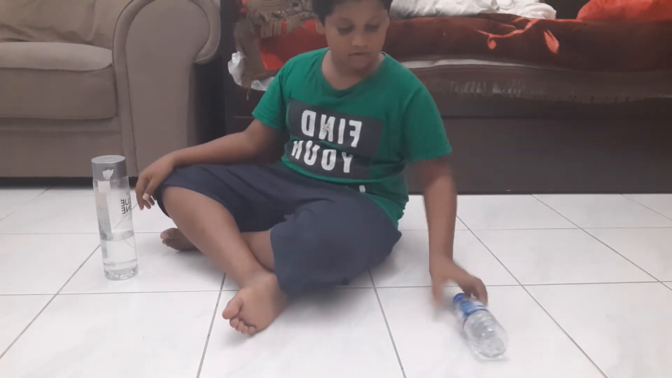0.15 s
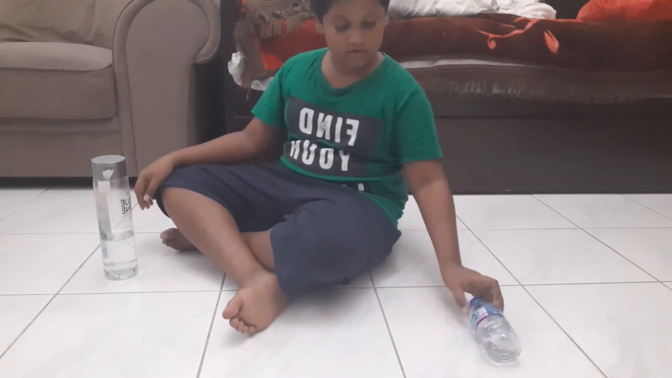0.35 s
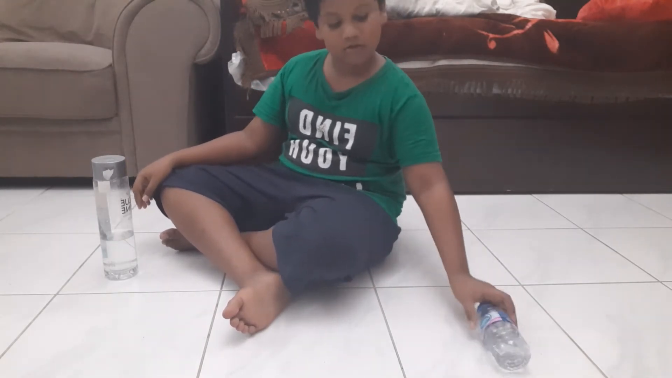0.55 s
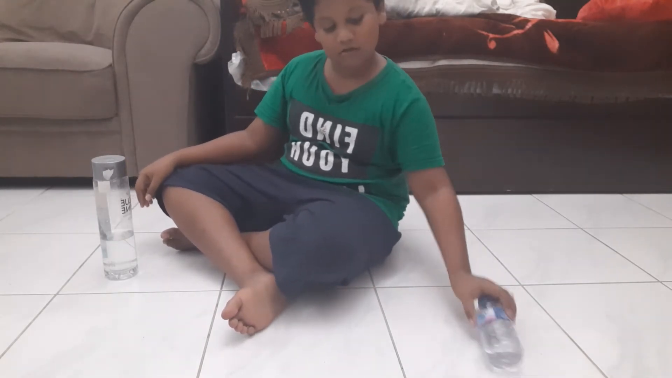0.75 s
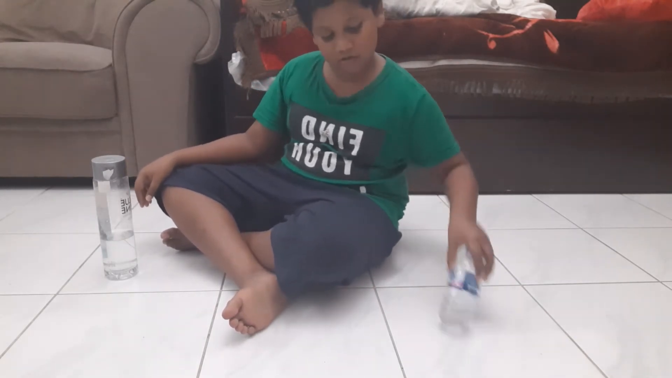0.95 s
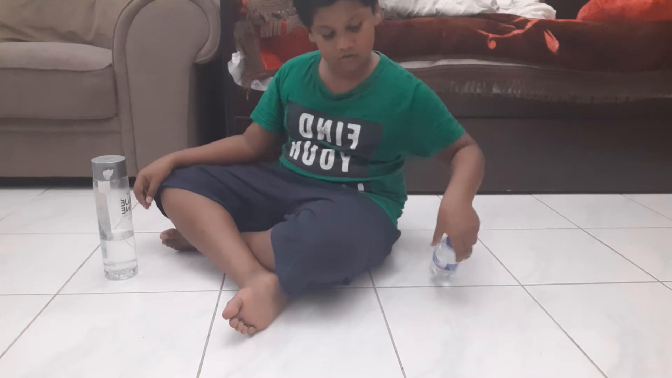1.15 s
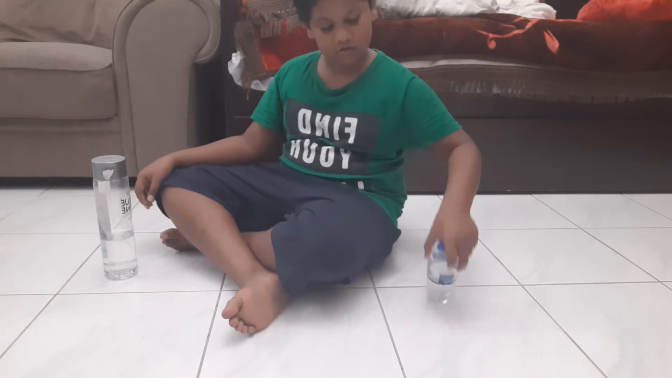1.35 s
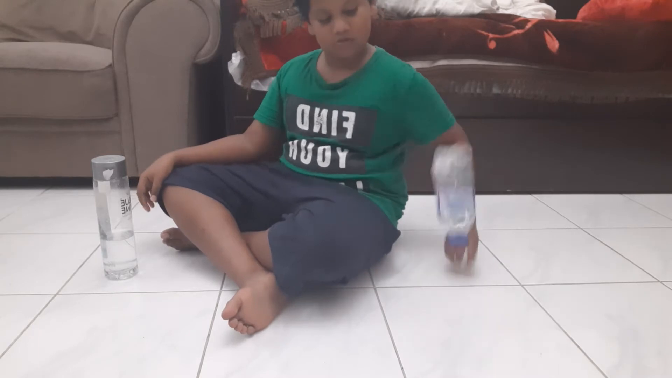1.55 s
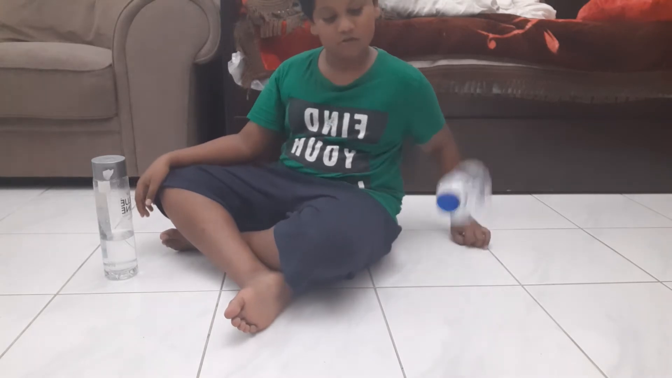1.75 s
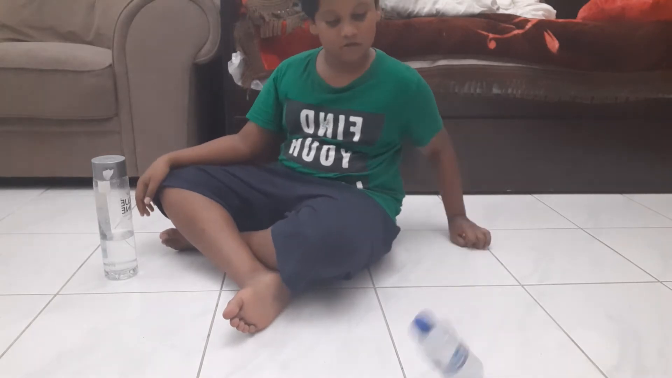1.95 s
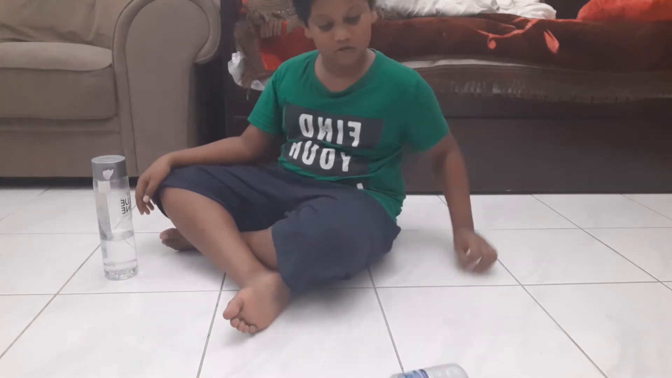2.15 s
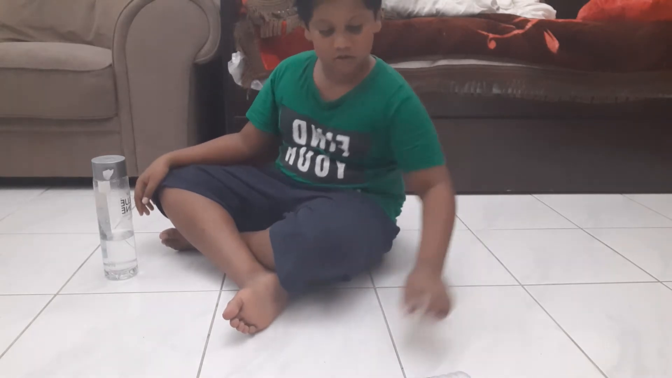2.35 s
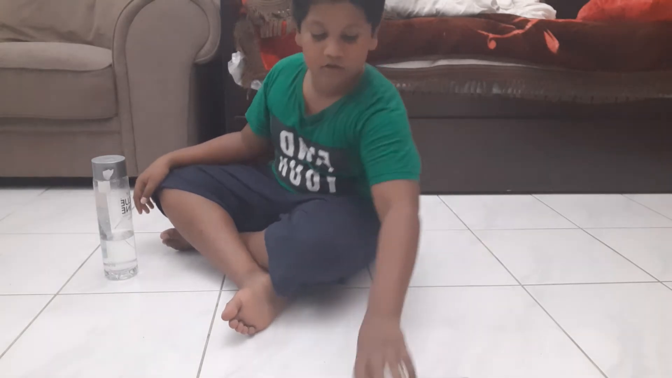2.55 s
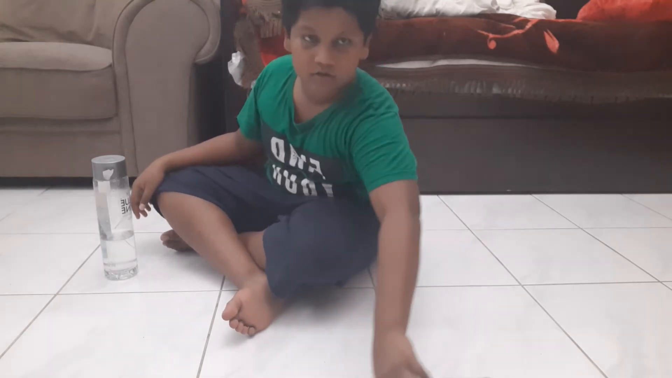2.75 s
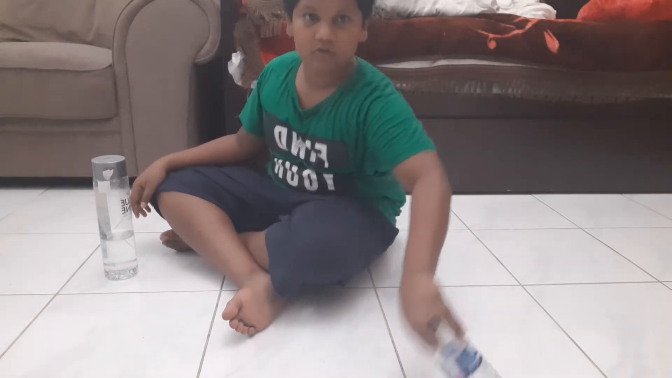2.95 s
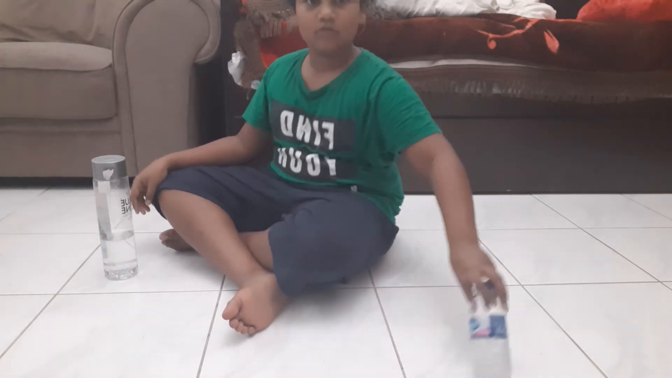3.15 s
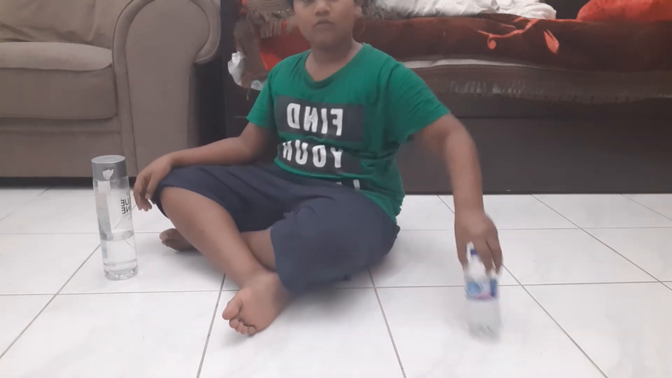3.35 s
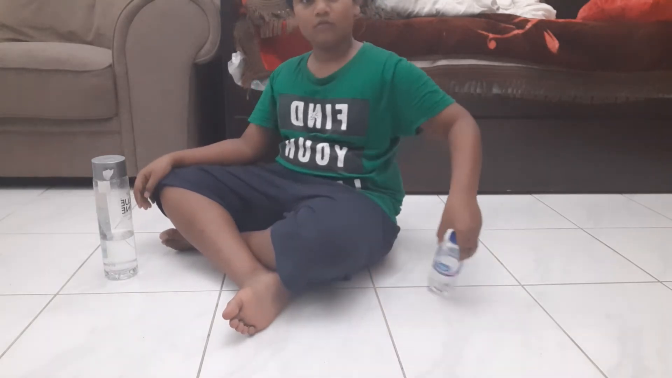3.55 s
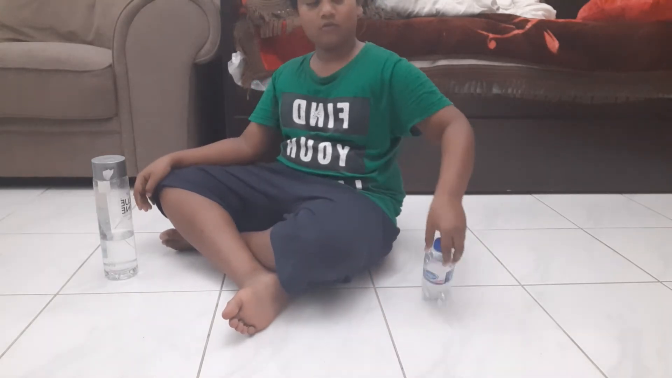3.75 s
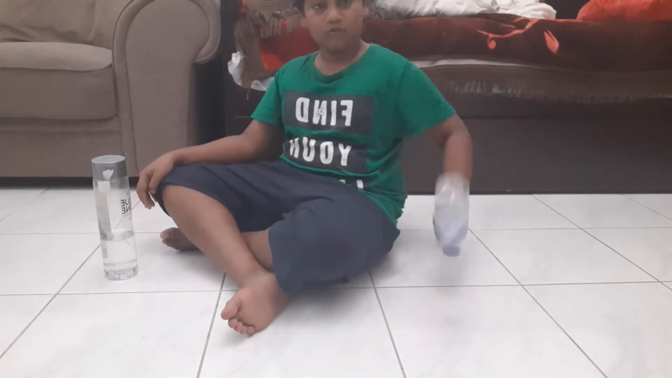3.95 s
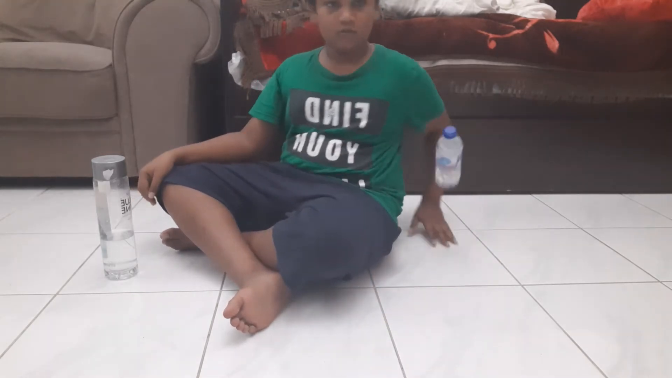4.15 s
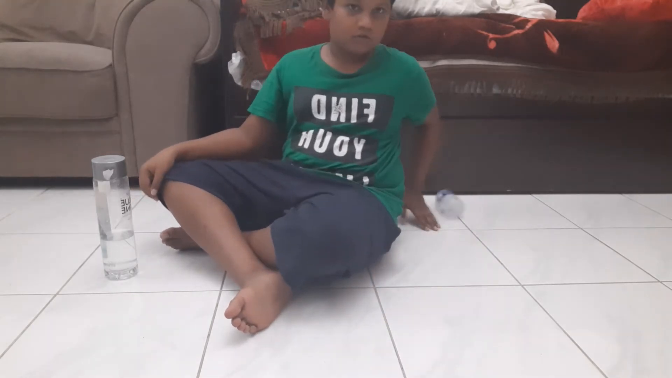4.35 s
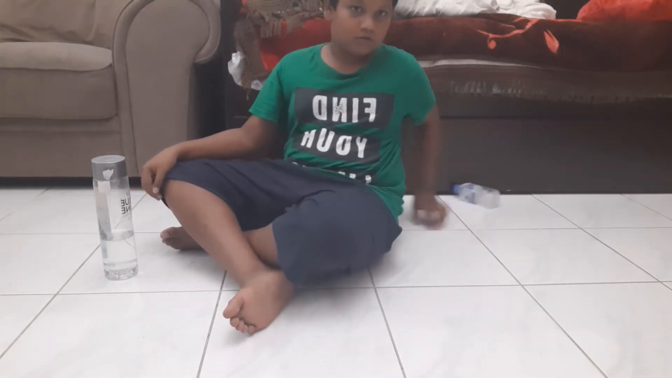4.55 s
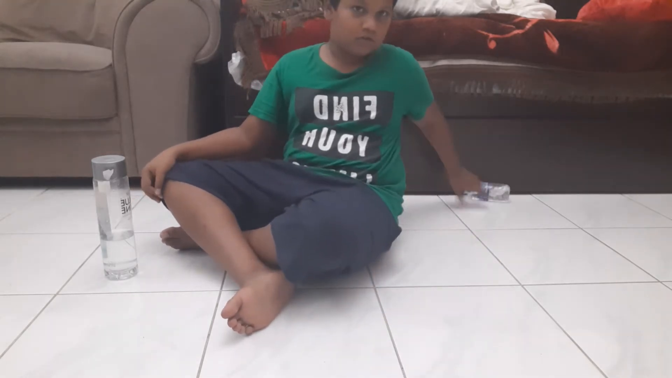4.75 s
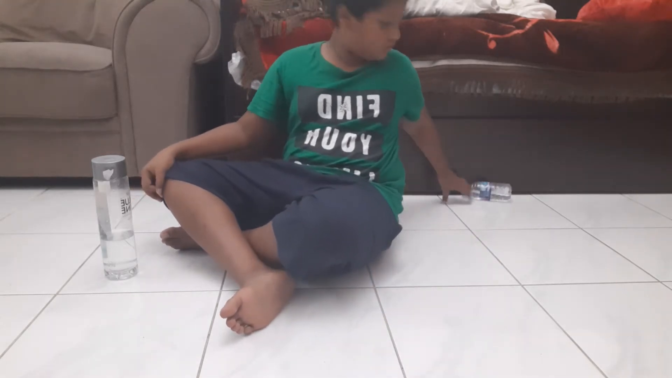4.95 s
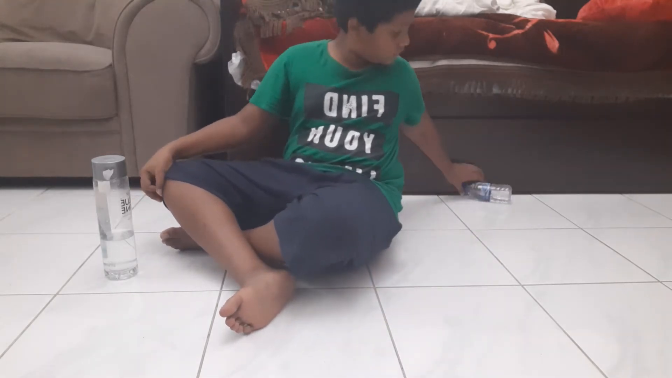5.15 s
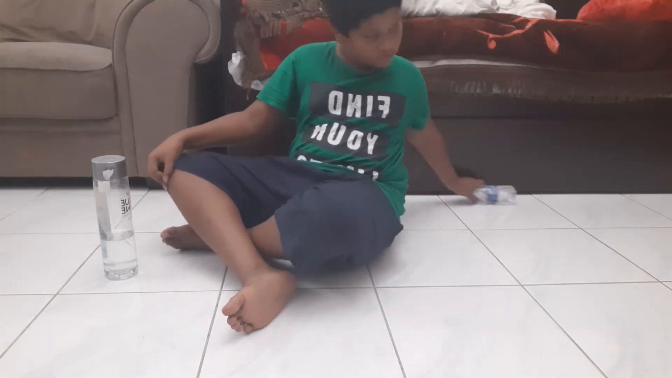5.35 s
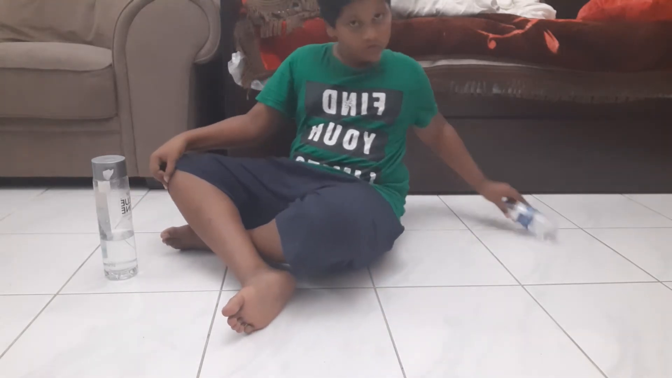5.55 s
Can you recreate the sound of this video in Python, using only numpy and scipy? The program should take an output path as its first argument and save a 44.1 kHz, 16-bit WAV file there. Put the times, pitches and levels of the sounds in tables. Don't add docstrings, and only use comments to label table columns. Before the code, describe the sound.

A furnished indoor room with a tiled floor, heard in stereo from a short distance. Throughout, a quiet fan gives uneven low rumble and soft air, with a faint mains hum, a raspy motor buzz slightly to the right and thin hiss. At 0 s fingers tick and crinkle a small, part-filled plastic bottle; sparse faint taps follow, with clearer hollow knocks at 1.3 to 1.6 s. At about 1.93 s the bottle smacks the tile: a loud, short, hollow plastic clack with a bright splash and a brief room tail, then a lower, weaker bounce at 2.08 s and small rolling ticks. From 2.7 to 3.4 s handling is very quiet. Crinkles and pops brighten around 3.85 to 4.3 s. At 4.35 s a light, splashy touch leads to a hard, dry clack at 4.48 s. Small knocks at 4.7 to 4.9 s settle into faint watery fizz and rustling until about 5.6 s.

```python
import sys
import numpy as np
from scipy import signal
from scipy.fft import rfft, irfft, next_fast_len
from scipy.io import wavfile
from scipy.ndimage import uniform_filter1d

SR = 44100
rng = np.random.default_rng(int(sys.argv[2]) if len(sys.argv) > 2 else 0)


def linear_from_db(decibels):
    return 10 ** (np.asarray(decibels, float) / 20)


def file_out(sig):
    cols = np.atleast_2d(sig).T
    lim = np.clip(cols, -1, 1)
    pcm = np.round(lim * 32767).astype(np.int16)
    wavfile.write(sys.argv[1], SR, pcm)


N = 246298
LONG = next_fast_len(N)
MAINS_HZ = 50.0


def level(x, db):
    return x * linear_from_db(db) / np.sqrt(np.mean(x ** 2))


def peak(x, db):
    return x * linear_from_db(db) / np.max(np.abs(x))


def add(track, s, x):
    i = int(s * SR)
    track[:, i:i + x.shape[1]] += x[:, :N - i]


def band(x, lo_hz, hi_hz, order=2):
    return signal.sosfilt(signal.butter(order, [lo_hz, hi_hz], "bandpass", fs=SR, output="sos"), x)


def on_log(table, hz):
    corner_hz, value = np.array(table).T[:2]
    return np.interp(np.log(hz + 1), np.log(corner_hz), value)


def fade(t, t60):
    return np.exp(-np.log(1000) * t / t60)


# (time [s], shell peak [dB], crack re shell [dB],
# splash re shell [dB], share sent to the walls [dB])
IMPACTS = [
    (1.933, -4, -12.5, -8.5, -5.5),
    (2.081, -15.5, -8, -8, -4.5),
    (4.353, -16, -19, -9.5, 2.5),
    (4.48, -2, -22.5, -22, -5),
]
# (frequency [Hz], level [dB], T60 [s])
SHELL_MODES = [
    [(220, 3, 0.029), (242, -6, 0.04), (495, -10.5, 0.073), (594, -30, 0.012), (977, 6, 0.047),
     (1473, 3.5, 0.054), (1686, 0, 0.027), (1974, -2, 0.03), (4040, 7.5, 0.033)],
    [(170, -1, 0.26), (357, -2, 0.098), (447, -20, 0.19), (598, 2.5, 0.035), (915, -8, 0.029),
     (1690, 8, 0.0084)],
    [(180, 6.5, 0.036), (393, -8, 0.047), (678, -29, 0.0297), (785, 5.5, 0.044), (1603, 6, 0.045),
     (2090, 12, 0.012), (4000, -1, .01)],
    [(268, -1, 0.063), (470, 3.5, 0.028), (614, 4.5, 0.04), (740, -6, 0.08), (923, 12, 0.028),
     (1120, 9.5, 0.007), (1620, 14.5, 0.009), (2440, 3.5, 0.0062)],
]


def landings():
    contact_s = 0.0073
    t = np.arange(1200) / SR
    out = np.zeros((2, N))
    for (s, db, crack_db, splash_db, wet_db), modes in zip(IMPACTS, SHELL_MODES):
        push = rng.standard_normal(1200) * np.exp(-(t / contact_s) ** 3)
        push[:8] -= 2.5
        shell = radiate(modes, db, uniform_filter1d(push, size=9))
        blow = shell + snap(db + crack_db, db + splash_db, 0.087)
        add(out, s, blow * [[1], [linear_from_db(wet_db)]])
    return out


def ring(modes, size=6000):
    t = np.arange(size) / SR
    return sum(linear_from_db(db) * fade(t, max(t60, .002)) * np.sin(2 * np.pi * hz * t) for hz, db, t60 in modes)


def same_energy(far, near):
    return far * np.sqrt(np.sum(near ** 2) / np.sum(far ** 2))


def radiate(modes, db, push):
    blur = 0.34
    near = peak(np.convolve(push, ring(modes))[:6000], db)
    broad = [(hz, g, t60 * blur) for hz, g, t60 in modes]
    far = np.convolve(np.hanning(9), ring(broad))[:6000]
    return np.array([near, same_energy(far, near)])


def snap(crack_db, splash_db, crack_t60, size=6000):
    t = np.arange(size) / SR
    noise = rng.standard_normal((2, size))
    click = 1. * (t == 0)
    crack = (noise[0], crack_t60, 2200, 7400, crack_db)
    splash = (noise[1], .007, 10200, 15000, splash_db)
    out = 0
    for x, t60, lo_hz, hi_hz, db in (crack, splash):
        near = peak(band(x * fade(t, t60), lo_hz, hi_hz), db)
        far = band(click, lo_hz, hi_hz)
        out = out + np.array([near, same_energy(far, near)])
    return out


# (time [s], air cavity peak [dB], cavity frequency [Hz],
# wall re cavity [dB])
HOLLOW_KNOCKS = [(.014, -58, 410, 16), (.366, -59.5, 393, 14.5), (.392, -54.5, 404, 10),
                 (1.321, -49, 165, -5), (1.341, -47.5, 292, 3), (1.5, -49, 383, -8), (1.609, -31, 170, -5),
                 (1.632, -42, 182, 5.5), (1.972, -40, 180, -3), (2.087, -44.5, 170, 24),
                 (2.187, -43, 160, 4), (2.687, -56, 382, 8), (3.027, -63, 167, 16), (3.142, -46.5, 554, 4),
                 (3.169, -61.5, 450, 15), (3.295, -67.5, 161, 21.5), (3.355, -54, 447, 2),
                 (3.854, -41.5, 447, -10), (3.97, -39, 440, -2.5), (3.978, -44, 382, 0),
                 (4.069, -45, 162, -12), (4.099, -59, 366, 10.5), (4.286, -37, 326, -15.5),
                 (4.312, -33.5, 309, -11), (4.486, -43, 288, 3), (4.712, -33.5, 340, -5.5),
                 (4.785, -51.5, 447, 10), (4.885, -49.5, 209, -5), (5.165, -47.5, 218, -21),
                 (5.238, -54, 289, 11.5)]
# (time [s], wall peak [dB], crack re wall [dB],
# splash re wall [dB])
WALL_CRINKLES = [(.003, -34.5, -8, -15), (.028, -35.5, -17, -11), (.465, -63, -5, 13), (.901, -54, 0, 2),
                 (1.137, -66, 9, 11), (1.322, -39.5, -10, -26), (1.509, -58, -1, 5), (1.518, -40, -21, 5.5),
                 (1.591, -45.5, -5, 8), (1.971, -25.5, 5.5, -29), (2.136, -36, 0.5, 2),
                 (2.373, -52, -1, -3), (2.668, -42, -5, -4), (2.96, -54, 1, 4), (3.057, -47.5, -0.5, -2),
                 (3.095, -52, -15, 2), (3.853, -45, 10, 0), (3.97, -39, 0.5, 3), (4.018, -47.5, 9.5, 14),
                 (4.035, -57.5, -0.5, 2.5), (4.055, -35.5, 2, 1), (4.068, -50, 7, -1), (4.286, -45, 3.5, 2),
                 (4.314, -45, 8, -16), (4.362, -15, -0.5, 7.5), (4.684, -39.5, -4, -3),
                 (5.457, -51, -5, 10), (5.556, -44, 3, -1)]


def ticks():
    lead_s = .001
    cavity_hz, cavity_db = 382, -12
    out = np.zeros((2, N))
    for s, db, hz, wall_db in HOLLOW_KNOCKS:
        add(out, s - lead_s, tick(db + wall_db, hz, db, -13, -10.5))
    for s, db, crack_db, splash_db in WALL_CRINKLES:
        add(out, max(s - lead_s, 0), tick(db, cavity_hz, db + cavity_db, crack_db, splash_db))
    return out


WALL_MODES = [560, 796, 970, 976, 1250, 1500, 1510, 1920]


def tick(wall_db, cavity_hz, cavity_db, crack_db, splash_db):
    chance = rng.standard_normal((2, len(WALL_MODES)))
    modes = [(hz * (1 + 0.0087 * a), 2.87 * b, .016) for hz, a, b in zip(WALL_MODES, *chance)]
    wall = radiate(modes, wall_db, np.hanning(9))
    cavity = radiate([(cavity_hz, 0, .07)], cavity_db, np.hanning(90)) * [[1], [.35]]
    return wall + cavity + snap(wall_db + crack_db, wall_db + splash_db, 0.012)


# (time [s], peak [dB], frequency [Hz], T60 [s])
SINGLE_RINGS = [(0.015, -44, 1680, 0.037), (0.017, -37, 2950, 0.0063), (1.317, -47, 1250, 0.092),
                (0.368, -54, 393, 0.33), (1.506, -47.5, 400, 0.2), (1.519, -48, 1250, 0.025),
                (1.608, -38.5, 980, 0.022), (1.609, -53, 740, 0.023), (2.670, -54, 379, 0.15),
                (2.09, -19, 170, 0.045), (2.089, -24, 357, 0.04), (2.138, -27, 3600, 0.0071),
                (2.372, -49.5, 2600, 0.016), (3.022, -59, 1315, 0.064), (3.059, -55, 2780, 0.021),
                (3.143, -49, 560, 0.074), (3.855, -35, 1565, 0.031), (3.854, -45.5, 1920, 0.027),
                (3.859, -48, 474, 0.026), (3.979, -36.5, 393, 0.13), (4.017, -32, 7600, .004),
                (4.053, -37, 4200, 0.014), (4.363, -21, 12500, .004), (4.713, -34, 343, 0.026),
                (4.884, -47.5, 820, 0.029)]


def pings():
    out = np.zeros((2, N))
    for s, db, hz, t60 in SINGLE_RINGS:
        add(out, s, radiate([(hz, 0, t60)], db, np.hanning(5)) * [[1], [.45]])
    return out


# (crest time [s], build-up [s], fizz [dB], scuff [dB])
WATER_SURGES = [(0, .01, -73.5, -49.5), (.18, .02, -70, -70), (.468, 0.29, -69, -61),
                (.924, 0.28, -68, -66.5), (1.04, .02, -80, -62), (1.19, .2, -82, -70),
                (1.514, 0.037, -77, -50), (1.79, 0.053, -78, -90), (2.667, .01, -69, -60.5),
                (3.21, 0.71, -75, -66.5), (3.958, 0.044, -66.5, -47), (4.054, 0.034, -76.5, -55),
                (4.35, 0.036, -71.5, -35.5), (4.62, .01, -71, -53.5), (4.81, .5, -70, -65.5),
                (5.303, 0.089, -62.5, -66.5), (5.35, 0.088, -66, -77), (5.5, 0.044, -62, -58.5),
                (5.58, 0.34, -60, -56.5)]


def slosh():
    build_db = 21.5
    fizz_ebb, scuff_ebb = 150, 263.5
    t, fizz, scuff = np.arange(N) / SR, 0, 0
    for s, build, fizz_db, scuff_db in WATER_SURGES:
        rising = build_db * np.minimum(t - s, 0) / max(build, .003)
        after = np.maximum(t - s, 0)
        fizz = fizz + linear_from_db(fizz_db + rising - fizz_ebb * after)
        scuff = scuff + linear_from_db(scuff_db + rising - scuff_ebb * after)
    noise = rng.standard_normal((2, N))
    grains = noise * linear_from_db(4.9 * np.minimum(rng.exponential(size=(2, N)), 7))
    water = level(band(grains[0], 11500, 16000), -10.0)
    label = level(band(grains[1], 1500, 8750), -8.5)
    return fizz * water + scuff * label


# (frequency [Hz], level [dB], T60 [s])
CASING = [(3900, -6, .008), (4430, -11, .012), (5570, 0, .008), (6910, -10, .009), (7620, -11, .009)]
# (time [s], level [dB])
RATTLES = [
    (.0058, 0),
    (.0078, -5),
    (.0106, -4),
    (.0132, -9),
]


def buzz():
    kicks = np.zeros(N)
    starts = np.arange(int(N / SR * MAINS_HZ)) / MAINS_HZ
    chance = rng.standard_normal((len(starts), len(RATTLES), 2))
    for k, (s, db) in enumerate(RATTLES):
        jittered = starts + s + .00008 * chance[:, k, 0]
        kicks[(jittered * SR).astype(int)] += linear_from_db(db + 2.5 * chance[:, k, 1])
    casing = signal.fftconvolve(kicks, ring(CASING, size=1500))[:N]
    return level(band(casing, 3840, 7360, order=4), -64.5)


def pair(alike, size):
    hz = np.arange(size // 2 + 1) * SR / size
    c = np.clip(on_log(alike, hz), -1, 1)
    mid, side = rfft(rng.standard_normal((2, size)))
    return hz, np.sqrt(1 + c) * mid + np.sqrt(1 - c) * side * np.array([[1], [-1]])


def walk(rate):
    k = int(SR / rate)
    held = np.repeat(rng.standard_normal(N // k + 1), k)
    x = uniform_filter1d(uniform_filter1d(held, k), k)[:N]
    return x / np.std(x)


# (frequency [Hz], density [dB per Hz])
AIR_SPECTRUM = [(25, -47), (46, -4), (68, -0.5), (84, -13), (125, -11), (220, -18), (550, -22), (700, -25),
                (1040, -18), (1500, -18), (2100, -25), (3050, -39), (5500, -31.5), (8200, -55)]
# (frequency [Hz], density [dB per Hz])
HISS_SPECTRUM = [(8100, -23), (9300, -8), (10300, 1), (12000, 7), (15800, 12), (16000, -22), (17000, -60)]
# (multiple of mains [1], level [dB])
HUM_HARMONICS = [(1, -88), (2, -61.5), (3, -74), (4, -75)]
# (frequency [Hz], likeness [-1 to 1])
AIR_COHERENCE = [(60, 1), (130, 0.73), (290, 0.81), (640, 0.24), (1410, -0.26), (16000, 0.39)]


def fan():
    hz, noise = pair(AIR_COHERENCE, LONG)
    air = irfft(noise * linear_from_db(on_log(AIR_SPECTRUM, hz)) * (hz < 8000), LONG)[:, :N]
    rumble = signal.sosfilt(signal.butter(2, 85, fs=SR, output="sos"), air)
    air = (air - rumble) * linear_from_db(0.066 * walk(3.7)) + rumble * linear_from_db(4.1 * walk(5.2))
    hiss = irfft(noise * linear_from_db(on_log(HISS_SPECTRUM, hz)) * (hz > 8000), LONG)[:, :N]
    t, hum = np.arange(N) / SR, 0
    for k, db in HUM_HARMONICS:
        hum = hum + linear_from_db(db + 2.0 + 2.4 * walk(4.49)) * np.sin(2 * np.pi * k * MAINS_HZ * t + k)
    return level(air, -56) + level(hiss, -74.5) + hum


# (frequency [Hz], T60 [s], level [dB])
REVERBERATION = [(142, 0.52, -4), (288, 0.46, 1.5), (555, 0.39, 3), (1100, 0.33, 2.5), (2130, 0.45, 1),
                 (4200, 0.48, 0.5), (9000, 0.51, -0.5), (12500, 0.39, 5.5)]
# (delay [s], level [dB])
REFLECTIONS = [(.0031, -6.5), (.0058, -6), (.0094, -9.5), (0.0171, -13.5)]
# (frequency [Hz], likeness [-1 to 1])
TAIL_COHERENCE = [(60, 0.93), (290, 0.95), (640, 0.53), (1410, -0.019), (3100, 0.36), (16000, -0.15)]


def room(near, far, wet_db, size=32768):
    hz, noise = pair(TAIL_COHERENCE, size)
    t, tail = np.arange(size) / SR, 0
    centres = np.log(np.array(REVERBERATION)[:, 0])
    for k, (_, t60, db) in enumerate(REVERBERATION):
        share = np.interp(np.log(hz + 1), centres, np.arange(len(REVERBERATION)) == k)
        tail = tail + linear_from_db(db) * irfft(noise * share, size) * fade(t, t60)
    tail = tail * (1 - np.exp(-t / 0.0049))
    tail = linear_from_db(wet_db) * tail / np.sqrt(np.mean(np.sum(tail ** 2, axis=1)))
    early = np.zeros((2, 2048))
    lag = int(.0001 * SR)
    direct = (0.0016, 0.012)
    for k, (s, db) in enumerate([direct] + list(REFLECTIONS)):
        early[0, int(s * SR) + lag * (1 + k % 3)] += linear_from_db(db)
        early[1, int(s * SR) + lag * (2 * k % 5)] += linear_from_db(db)
    heard = signal.fftconvolve(near[None], early, axes=1)[:, :N]
    return heard + signal.fftconvolve(far[None], tail, axes=1)[:, :N]


def scene():
    near, far = linear_from_db(-2) * landings() + ticks() + pings() + slosh()
    rattle = buzz()
    motor = np.array([np.roll(rattle, shift=4), rattle]) * linear_from_db([[-2.], [2.]])
    motor = motor + room(0 * rattle, rattle, -5)
    no_bass = signal.butter(3, 105, "highpass", fs=SR, output="sos")
    bottle = signal.sosfilt(no_bass, room(near, far, 6.2))
    return bottle + motor + fan()


def roll_off(x):
    return signal.sosfilt(signal.butter(12, 16810, fs=SR, output="sos"), x)


# (frequency [Hz], gain [dB])
PORT_RESPONSE = [(20, -10), (42, 1), (7950, 0), (8200, -5), (8800, -9.5), (10000, -6), (15780, -6.5),
                 (15980, -33.5)]


def record(dry):
    balance_db = -2.1
    hz = np.arange(LONG // 2 + 1) * SR / LONG
    coloured = irfft(rfft(dry, LONG) * linear_from_db(on_log(PORT_RESPONSE, hz)), LONG)[:, :N]
    mix = coloured * linear_from_db([[balance_db / 2], [-balance_db / 2]])
    return roll_off(mix)


dry = scene()
out = record(dry)
file_out(out)
```